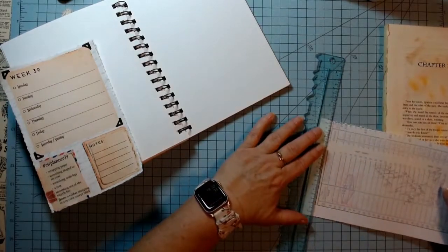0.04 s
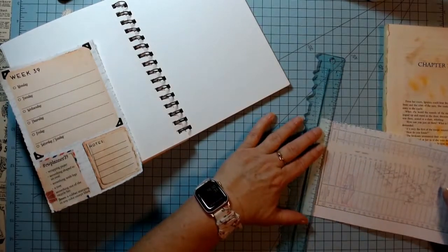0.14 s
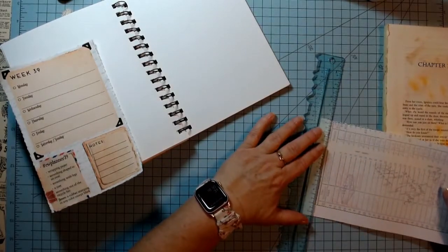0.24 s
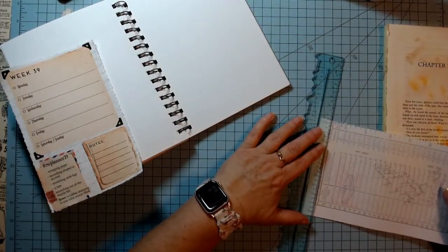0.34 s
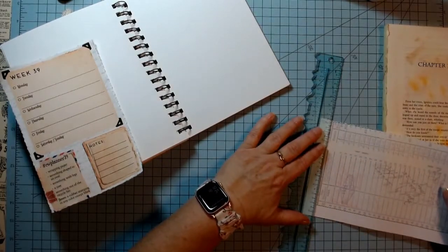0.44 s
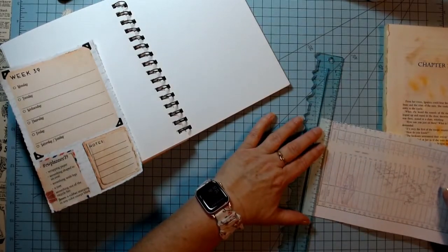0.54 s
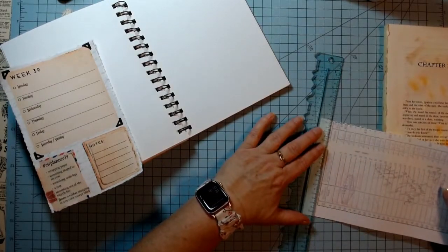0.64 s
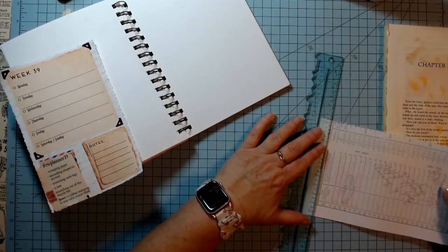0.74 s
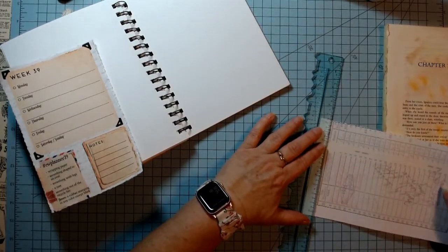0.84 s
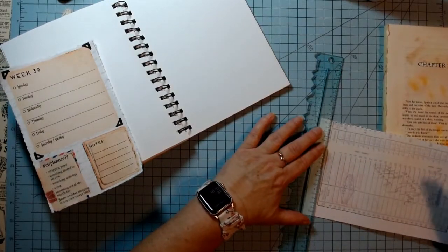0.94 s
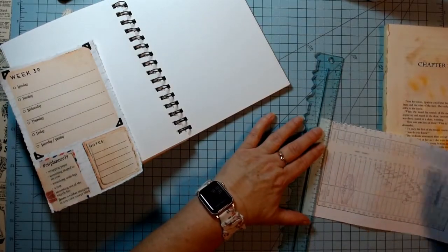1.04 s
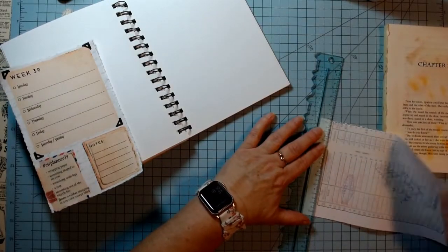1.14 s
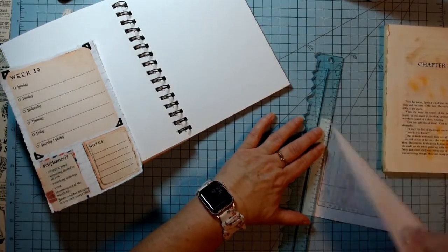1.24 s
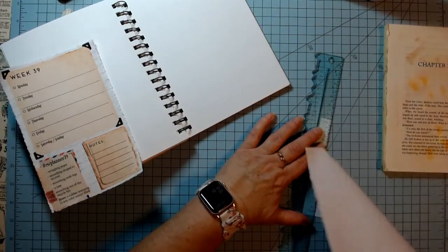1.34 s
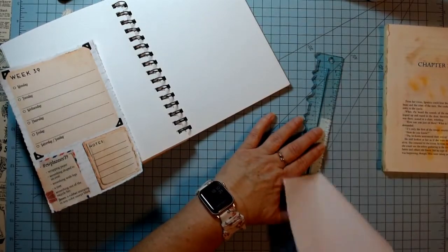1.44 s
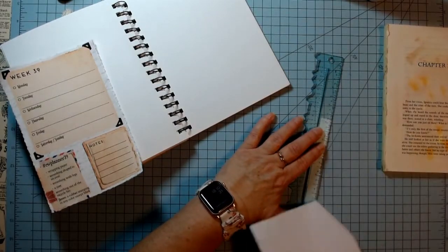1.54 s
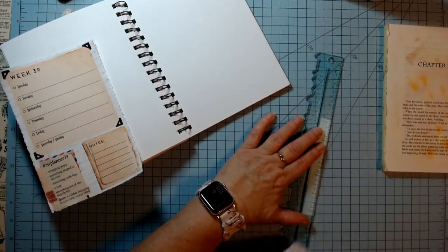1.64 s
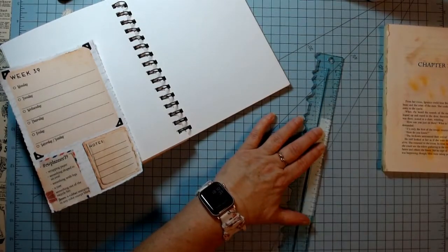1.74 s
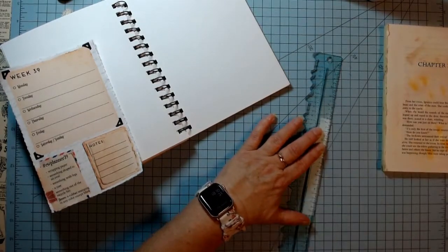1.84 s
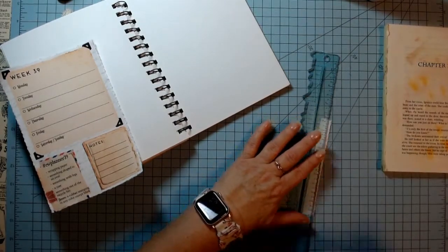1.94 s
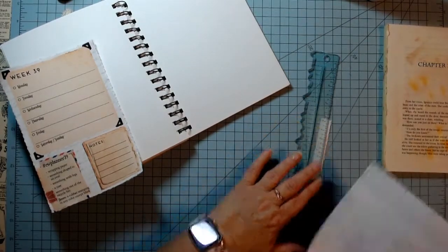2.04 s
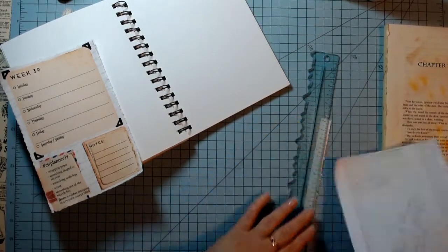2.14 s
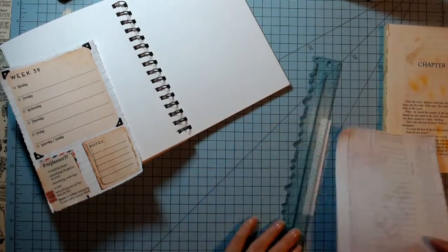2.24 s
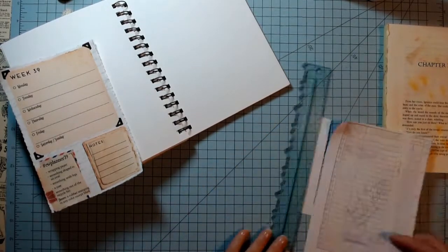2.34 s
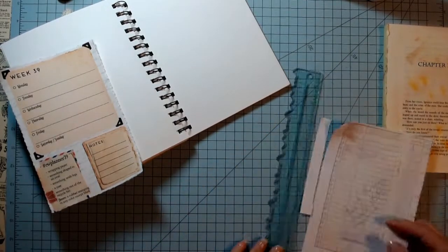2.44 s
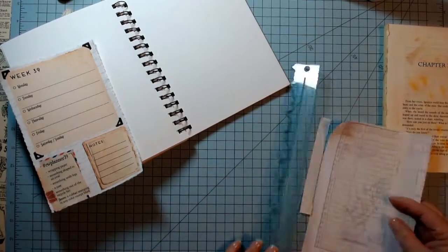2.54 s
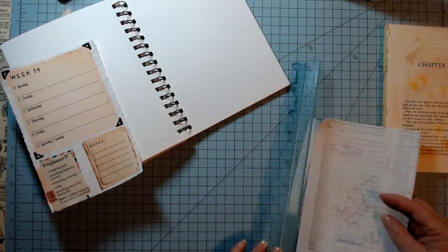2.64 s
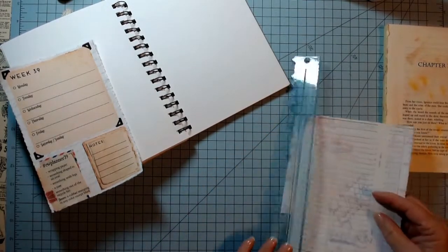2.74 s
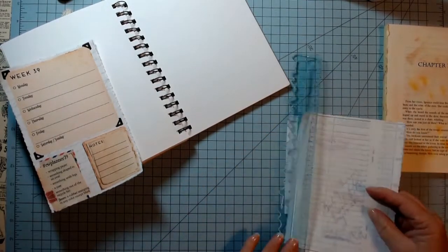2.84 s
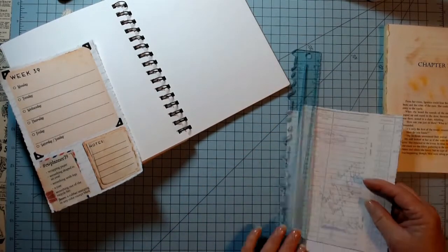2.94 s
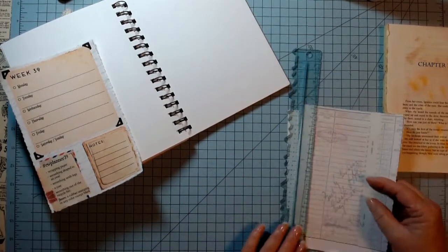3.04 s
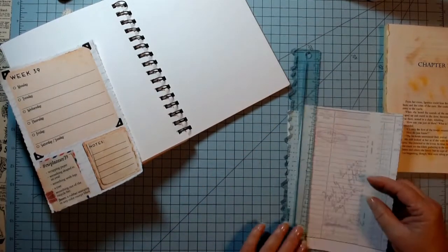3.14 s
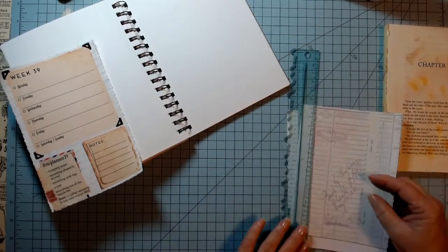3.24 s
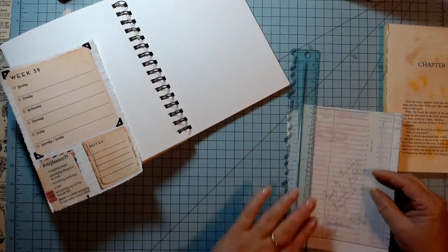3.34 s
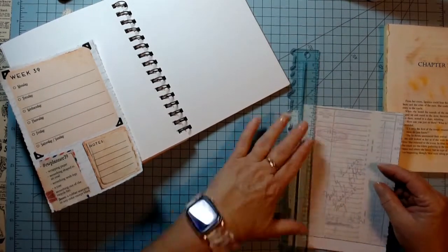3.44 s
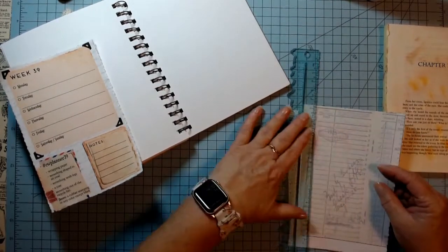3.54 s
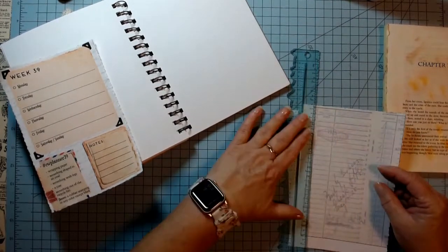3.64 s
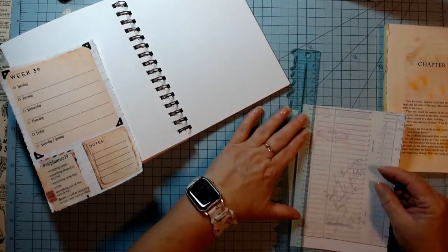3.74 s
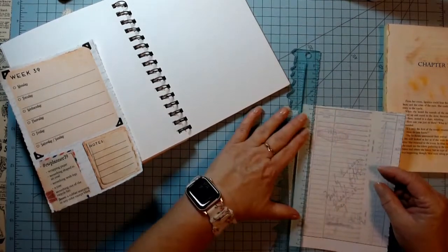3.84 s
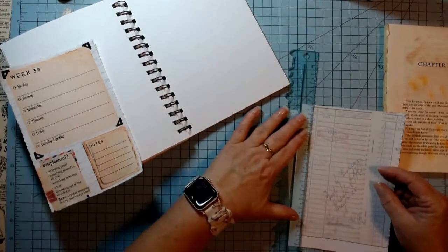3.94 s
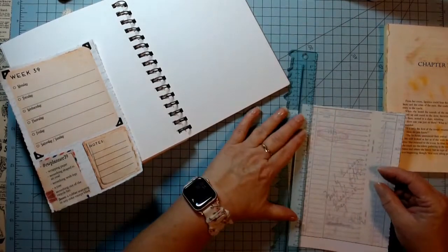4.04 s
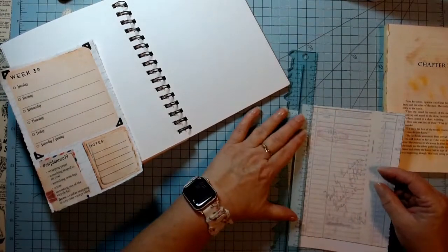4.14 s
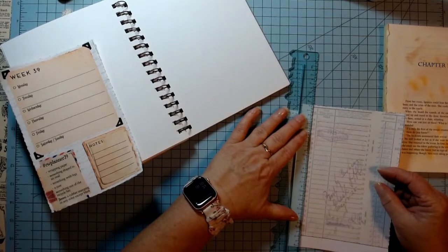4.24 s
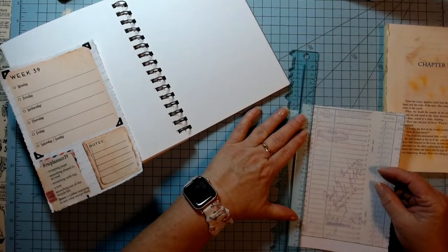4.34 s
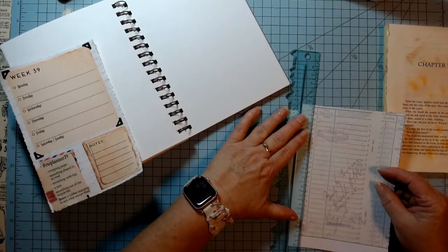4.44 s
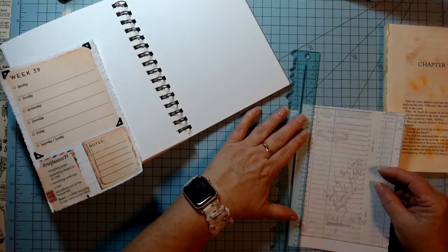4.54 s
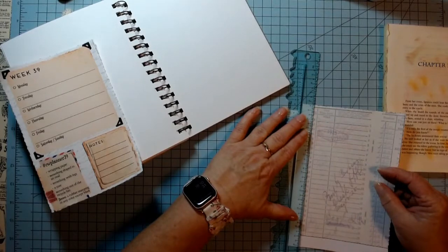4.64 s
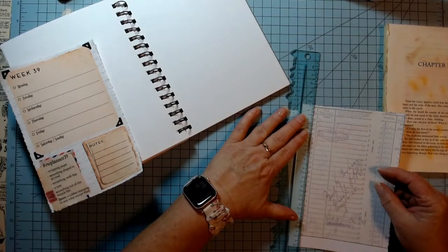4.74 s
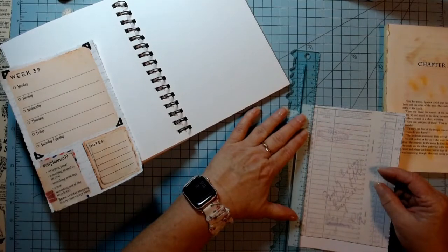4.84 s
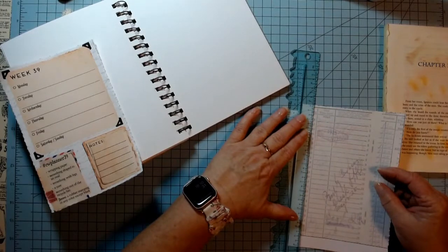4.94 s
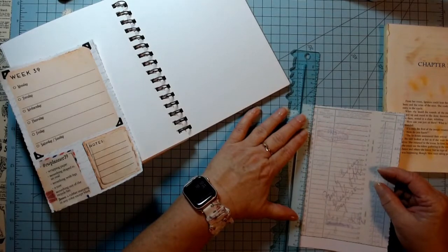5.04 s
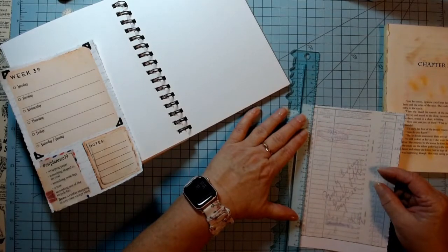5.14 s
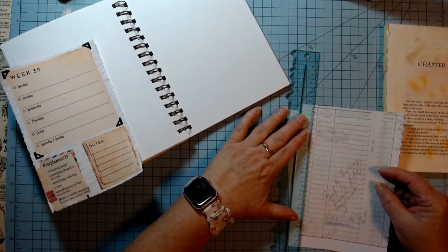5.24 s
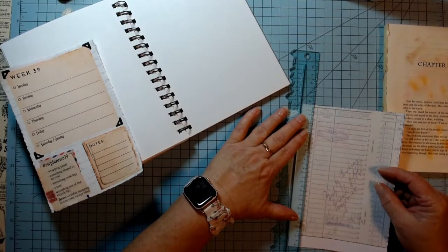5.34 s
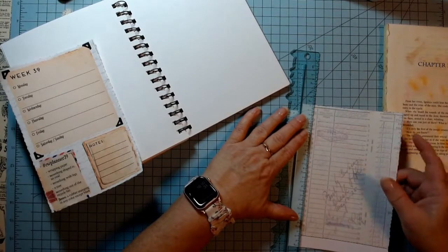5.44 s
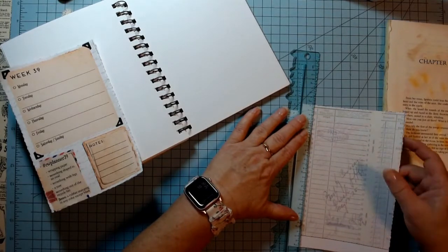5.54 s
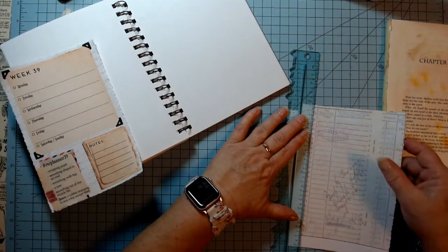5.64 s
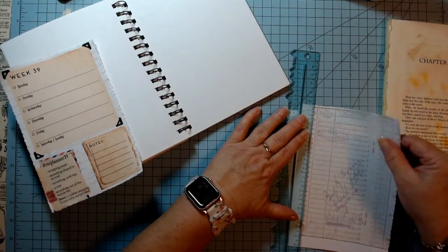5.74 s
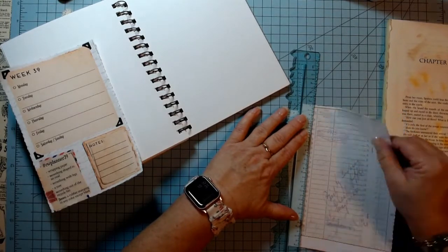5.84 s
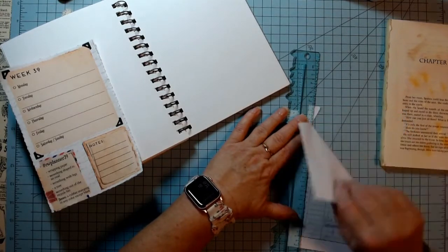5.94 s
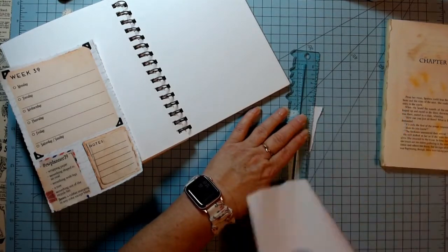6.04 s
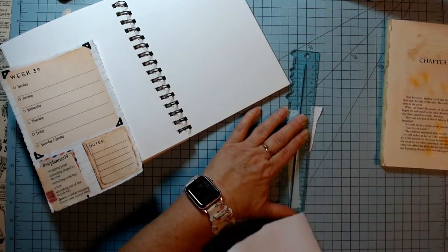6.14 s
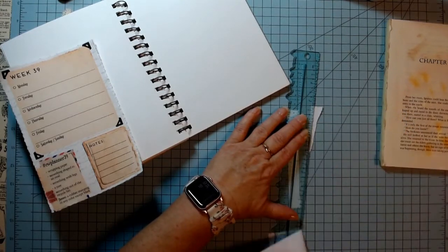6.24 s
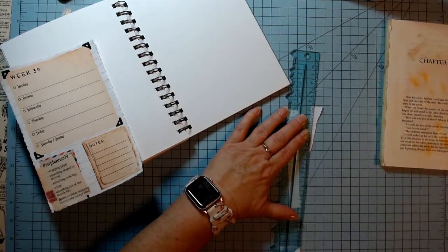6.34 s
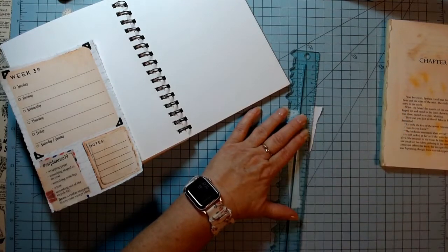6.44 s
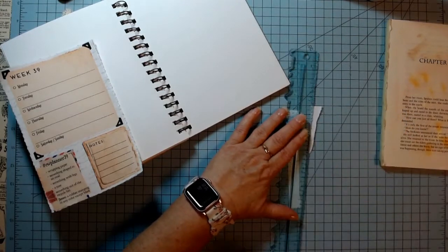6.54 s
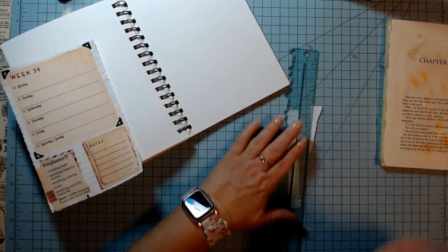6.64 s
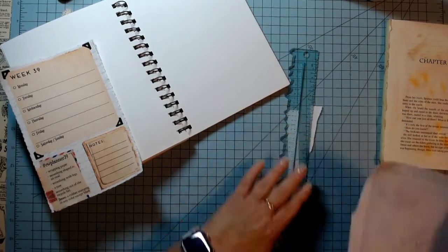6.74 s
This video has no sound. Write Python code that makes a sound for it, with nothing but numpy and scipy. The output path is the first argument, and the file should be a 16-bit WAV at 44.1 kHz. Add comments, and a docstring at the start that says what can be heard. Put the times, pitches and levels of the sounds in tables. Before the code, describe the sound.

A quick, dry rip of paper along a ruler's edge is followed by light crinkles and soft sliding on a cutting mat. The plastic ruler clacks down once and is nudged faintly. Following a lull, another rip starts strongly and trails off, the loose flap fluttering and snapping. The microphone is near the desk in a small room with a low hum and a barely audible, high pulsing whine.

```python
"""In a small room, two strips are ripped off a sheet of paper along a plastic ruler on a cutting mat.
Each rip is a dense run of snapping fibres that shakes the sheet, while the freed flap flutters.
Between the rips the sheet is flicked and slid, with small squeaks, and the ruler lands with a clack.
Underneath lie quiet room noise, a low hum and the faint pulsing whine of a camera."""
import sys
import numpy as np
from scipy import signal
from scipy.fft import rfft, irfft, next_fast_len
from scipy.io import wavfile
from scipy.ndimage import uniform_filter1d

SR = 44100
rng = np.random.default_rng(int(sys.argv[2]) if len(sys.argv) > 2 else 0)


def unload_audio(sound):
    """Save the sound as a 16-bit wav file, at the path given as the first command line argument."""
    columns = np.transpose(np.atleast_2d(sound))
    # keep every value between -1 and 1, then stretch to whole-number steps
    steps = np.round(np.clip(columns, -1, 1) * 32767)
    wavfile.write(sys.argv[1], SR, steps.astype(np.int16))


N = 299483
SIZE = next_fast_len(N + SR // 4, real=True)
TIME, HZ = np.arange(N) / SR, np.fft.rfftfreq(SIZE, 1 / SR)

# three ranges of sound, called body (middle), fizz (high) and bass: (low edge [Hz], high edge [Hz])
# In the tables below, "fizz" and "bass" are levels compared with the body.
BANDS = [(400, 1600), (1600, 14000), (70, 400)]
# how hard the hand pulls, one curve a pull; the second rip takes two: (time [s], level [dB])
PULL_LEVELS = [
    [(1.213, -21), (1.245, -18.5), (1.291, -25), (1.325, -20), (1.387, -26), (1.477, -24.5), (1.501, -28),
     (1.565, -29), (1.585, -35.5)],
    [(5.786, -28.5), (5.79, -26), (5.89, -19), (5.972, -22), (6.026, -26.5), (6.048, -23.5), (6.118, -41),
     (6.162, -32.5)],
    [(6.165, -32.5), (6.193, -31), (6.237, -38.5), (6.399, -34.5), (6.407, -41), (6.445, -43)],
]
# how each pull's tone drifts: (first fizz [dB], last fizz [dB], first bass [dB], last bass [dB])
PULL_DRIFTS = [(5.5, 0, -3, -11), (-4, -1.5, -8, 0.5), (-5, 2.5, -5.5, -11.5)]
# the paper's tone colour, one curve a pull: (frequency [Hz], level [dB])
PAPER_COLOURS = [
    [(50, -40.5), (85, -15.5), (126, 0), (237, -6.5), (314, 0), (382, -4.5), (553, -4.5), (893, 1.5),
     (1870, -3), (2230, -1), (3090, -3.5), (3370, -5), (4200, -10), (4580, -6.5), (15500, -35.5)],
    [(50, -44.5), (85, -16), (134, 3), (232, -6.5), (294, 2.5), (374, -1), (659, -5.5), (893, -2.5),
     (1020, -4), (1440, -4.5), (1760, -11.5), (2230, -6), (3760, -15.5), (5220, -16.5), (15500, -43)],
    [(50, -38), (85, -6.5), (134, -2), (270, -14), (314, -5), (350, -5.5), (644, -7), (751, -7), (819, -3),
     (1680, -13), (2000, -5.5), (5220, -16.5), (15500, -42)],
]
# the freed flap flutters: (start [s], length [s], first pitch [Hz], level [dB])
FLUTTERS = [(1.335, .085, 343.8, -35.5), (1.385, .05, 165, -33), (1.495, 0.044, 150, -38),
            (1.545, .035, 139.1, -37.5), (5.85, 0.063, 168.1, -28.5), (5.935, .05, 326.3, -22),
            (6.16, .055, 140, -37)]
# the sheet buckles: (time [s], level [dB], fizz [dB], bass [dB])
FLICKS = [(1.019, -61.5, 6, -10), (1.127, -25, -10, -9.5), (1.137, -33, 5, -15), (1.212, -17, -5, 3),
          (1.715, -18, -19.5, -26), (1.787, -31, -10.5, -22.5), (1.869, -33, -30, -3),
          (2.011, -48, 9.5, -24), (2.28, -45.5, 2, -28), (5.435, -49, 13.5, 0), (5.635, -61, 6, -8),
          (6.042, -15, -12, -10.5), (6.131, -24.5, -17, -13), (6.163, -16.5, -16, -7),
          (6.451, -28.5, -36, -14), (6.53, -31.5, -2.5, -5), (6.715, -47, -7.5, 5)]
# the ruler lands and rocks: (time [s], level [dB], fizz [dB], bass [dB])
KNOCKS = [(2.905, -68.5, 14, 4), (2.993, -39, -1, -1.5), (2.999, -25, -0.5, -5.5), (3.003, -19, -5, -8),
          (3.046, -26, -3, -5), (3.24, -67.5, 3.5, -7.5), (3.44, -54, -5, 3.5), (3.467, -43.5, -15, -7),
          (6.734, -46, -18, -1.5)]
# the tone colour of the ruler's slap: (frequency [Hz], level [dB])
SLAP_COLOUR = [(35, -32), (60, -0.5), (156, 7.5), (226, -22), (266, 7.5), (443, -15), (546, -22),
               (705, -15), (1150, -21.5), (1380, -13.5), (1550, -24.5), (1960, -10.5), (6870, -27.5),
               (15500, -47)]
# the ruler's own notes: (pitch [Hz], level [dB], time to fade 60 dB without the hand on it [s])
RULER_NOTES = [(208, 5.5, 0.36), (705, -34, 0.39), (1780, -29, 0.23), (1930, -13, 0.48), (3000, -11, 0.17),
               (3050, -20, 0.18), (3980, -24, 0.22), (4450, -29, 0.82)]
# frequencies that the plastic strengthens: (centre [Hz], width [Hz], level [dB])
PLASTIC_PEAKS = [(2737, 160, 2), (4960, 289, -8)]
# paper and hand slide on the mat: (start [s], length [s], level [dB], fizz [dB], bass [dB])
PAPER_SLIDES = [(.735, .04, -83, 8.5, -3), (.84, .28, -83, 2, 2), (1.116, 0.071, -46.5, -16.5, 7),
                (1.58, 0.035, -42.5, -13.5, -13), (1.66, .05, -55, -18, -11),
                (1.703, 0.11, -43.5, -11, -18), (1.83, 0.19, -57, 0.5, -13), (2.04, 0.14, -70, 6, -12),
                (2.12, 0.12, -57, -3, -7), (2.265, 0.067, -54.5, -6, -4), (2.36, 0.19, -74, -4.5, 3),
                (2.54, 0.071, -70, 8, -15), (5.32, 0.11, -73.5, 2, 2), (5.42, 0.037, -61.5, 0.5, 6.5),
                (5.69, 0.07, -74.5, -8.5, 5.5), (5.772, 0.018, -48.5, -6, 6.5),
                (6.44, 0.015, -43.5, -13.5, -9.5), (6.53, 0.023, -54, -5, 5.5)]
# the ruler is nudged over the mat: (start [s], length [s], level [dB], fizz [dB], bass [dB])
RULER_SLIDES = [(2.785, 0.052, -70.5, 4.5, -3), (2.895, 0.034, -79.5, 14, -1),
                (3.09, 0.06, -71.5, -8.5, 7.5), (3.235, 0.074, -82.5, 2, 3), (3.44, 0.045, -66.5, -3, 9),
                (5.23, 0.083, -79.5, 4, 5), (5.52, 0.15, -80.5, 5, 4), (6.6, .11, -78, 4.5, 6),
                (6.71, .075, -68, 3.5, 0)]
# the tone colour of sliding on the mat: (frequency [Hz], level [dB])
SLIDE_COLOUR = [(88, -38.5), (150, -8), (221, -0.5), (258, -5), (388, -4), (509, -3), (1060, 0.5),
                (1150, -2.5), (1910, -5.5), (2270, -4), (5330, -12.5), (8170, -25.5), (15500, -32)]
# squeaks on the mat: (start [s], length [s], first pitch [Hz], level [dB], glide [octaves/s])
SQUEAKS = [(.6, 0.064, 451, -75, 2.5), (1.708, 0.018, 660, -43, 6), (2.272, 0.026, 1905, -47, -5.5),
           (2.555, 0.069, 1785, -61, 5.5), (2.66, 0.087, 754, -71.5, -1.3), (2.9, 0.027, 2730, -72.5, 0.5),
           (3.25, 0.094, 2770, -87, -0.5), (3.52, 0.1, 434, -60, 1), (5.135, 0.056, 400, -71, 0.5),
           (6.712, 0.054, 2850, -54, 1), (6.735, 0.087, 3590, -60, 2.5)]
# how long the room echoes: (frequency [Hz], time to fade 60 dB [s])
ECHO_FADE = [(150, 0.14), (400, 0.058), (1040, 0.15), (2760, 0.18), (7280, 0.21), (15000, 0.026)]
# how alike the echoes are left and right: (frequency [Hz], likeness [1 = the same])
ECHO_LIKENESS = [(100, .95), (300, .9), (640, .68), (1400, .35), (3000, .08), (8000, -.1)]
# how the sound leans to one side: (frequency [Hz], left minus right [dB])
SIDE_LEAN = [(60, 5), (110, 0), (200, 4.5), (380, 1), (700, 2), (1290, 2), (2380, 0.5), (4400, -0.5),
             (8120, 0.5), (15000, -1)]
# the tone colour of the room noise: (frequency [Hz], level [dB])
AIR_COLOUR = [(12, -31), (20, 3), (53, -2.5), (70, -16.5), (92, -16.5), (148, -19), (342, -22.5),
              (416, -31.5), (614, -33), (2610, -45), (4070, -48), (4680, -50), (7730, -47.5), (8880, -63.5),
              (15500, -62.5)]
# how alike the room noise is left and right: (frequency [Hz], likeness [1 = the same])
AIR_LIKENESS = [(60, 0.72), (130, 1), (290, 0.51), (640, 0.63), (1410, 0.079), (3100, 0.04), (6820, 0.33),
                (15000, 0.2)]
# how loud the whine's pulses are: (time [s], level [dB])
WHINE_LEVELS = [(0, -88), (5.1, -86), (5.6, -79.5), (6.7, -75.5)]
# the tones in the whine: (pitch [Hz], relative level [dB])
WHINE_TONES = [(7000, -11.5), (7650, -8.5), (8000, -2.5), (12000, -12.5)]


def tearing():
    """Fibres snap by the thousand along the ruler's edge; the tear catches and runs in small surges."""
    surge = gain_of(1.1 * wander(100))
    fibres = [evened(surge * snaps(per_s=3000, spread_db=2, clump_db=1.5, clump_hz=180)) for _ in BANDS]
    return sum(friction(pull_force(curve, drift), colour, fibres, trims_db=(.3, .3, -1.5))
               for curve, drift, colour in zip(PULL_LEVELS, PULL_DRIFTS, PAPER_COLOURS))


def pull_force(curve, drift, edge_s=.006):
    """One pull shares its force between body, fizz and bass; the shares drift as the tear runs."""
    times, levels = np.transpose(curve)
    level_db = np.interp(TIME, times, levels)
    start, end = times[0], times[-1]
    fizz_db = np.interp(TIME, [start, end], drift[:2])
    bass_db = np.interp(TIME, [start, end], drift[2:])
    fizz_db += 0.23 * (level_db - level_db.max())  # a slacker pull snaps fewer fibres and sounds duller
    pulling = np.clip(np.minimum(TIME - start, end - TIME) / edge_s + .5, 0, 1)
    body = pulling * gain_of(level_db) / np.hypot(1, gain_of(fizz_db))
    return body * gain_of([np.zeros(N), fizz_db, bass_db])


def flap_flutter(fall_octaves_per_s=6.5):
    """The freed flap flutters, each time dropping in pitch as it grows longer."""
    rows = [(*row, -fall_octaves_per_s) for row in FLUTTERS]
    return glides(rows, jitter=0.047, jitter_hz=80, rough_db=1)


def sheet_flicks():
    """The sheet buckles with a small crack and a short crinkle."""
    return blows(FLICKS, PAPER_COLOURS[0], trims_db=(-6, -6.5, -8), crack=0.64, rise_s=.0015, fade_s=.008)


def ruler_knocks(damping_s=0.048):
    """The ruler slaps the mat and rings with its own notes, which the hand quickly damps."""
    slap = blows(KNOCKS, SLAP_COLOUR, trims_db=(-4.5, -5, -4), crack=4.2, rise_s=0.00028, fade_s=0.0054)
    t, ringing = TIME[:SR // 2], np.zeros(N)
    ring = sum(gain_of(db - 60 * t / fade_s) * np.sin(2 * np.pi * hz * t)
               for hz, db, fade_s in RULER_NOTES)
    ring *= np.exp(-t / damping_s)
    for start, db, *_ in KNOCKS:
        part = ringing[round(start * SR):][:len(t)]
        part += gain_of(db - 19.5) * ring[:len(part)]
    return slap + ringing


def through_ruler(x, contact_db):
    """The plastic strengthens some frequencies of whatever rubs or knocks on it."""
    peaks = sum(gain_of(db + contact_db) / (1 + 2j * (HZ - hz) / width)
                for hz, width, db in PLASTIC_PEAKS)
    return shaped(x, 1 + peaks)


def sliding(rows, rise_s=0.029, sag_db_per_s=14, stop_s=.022):
    """A slide is a fine run of tiny catches: it gathers speed, eases off and coasts to rest."""
    catches = [snaps(per_s=7000, spread_db=3, clump_db=1.5, clump_hz=60) for _ in BANDS]
    force = np.zeros((3, N))
    for start, length, db, fizz_db, bass_db in rows:
        part = force[:, round(start * SR):][:, :SR // 2]
        t = TIME[:part.shape[1]]
        speed = np.minimum(t / rise_s, 1) * np.exp(-np.maximum(t - length, 0) / stop_s)
        part += speed * gain_of(db - sag_db_per_s * t) * gain_of([[0], [fizz_db], [bass_db]])
    return friction(force, SLIDE_COLOUR, catches, trims_db=(.3, .3, -1))


def mat_squeaks():
    """Paper, fingers and ruler stick and slip on the mat, making short, rough tones."""
    return glides(SQUEAKS, jitter=.117, jitter_hz=670, rough_db=1.5)


def room(x):
    """The sound shifts at random between two patches of the sheet, each with its own echoes."""
    share = uniform_filter1d(1. * (wander(45) > 0), size=100)
    first, second = (echo_path(left_delay_s=samples / SR) for samples in (3, 4.7))
    heard = shaped(x * share, first) + shaped(x * (1 - share), second)
    return shaped(heard, gain_of(read(SIDE_LEAN) * np.array([[.5], [-.5]])))


def echo_path(left_delay_s, early_db=1.5, tail_db=-2, early_s=0.013):
    """The direct sound reaches the right side first; desk and walls answer with dense echoes."""
    n, echoes_per_s = SR // 2, 5000
    bounces = rng.standard_normal((2, 2, n)) * (rng.random((2, 2, n)) < echoes_per_s / SR)
    near, far = bounces * (TIME[:n] > .0006)
    early = near * np.exp(-TIME[:n] / early_s)
    hz, t, spectrum = signal.stft(far, SR, nperseg=256)
    fade = gain_of(-60 * t / read(ECHO_FADE, hz)[:, None])
    tail = signal.istft(spectrum * fade, SR, nperseg=256)[1][:, :n]
    echoes = (gain_of(early_db) * evened(early) + gain_of(tail_db) * evened(tail)) / np.sqrt(n)
    response = rfft(paired(np.pad(echoes, ((0, 0), (0, N - n))), ECHO_LIKENESS), SIZE)
    response += np.exp(-2j * np.pi * HZ * np.array([[left_delay_s], [0]]))  # the direct sound
    # keep the echoes' fine ripples, but even out the broad tone colour
    summed_power = np.cumsum(abs(response.mean(0)) ** 2)
    lo, hi = (np.searchsorted(HZ[:-1], edge) for edge in (HZ * .9 - 25, HZ * 1.1 + 25))
    return response * causal(np.sqrt((hi - lo) / (summed_power[hi] - summed_power[lo])))


def room_air(rumble_cut_hz=45):
    """Quiet, deep room noise whose level wavers a little."""
    colour = gain_of(read(AIR_COLOUR))
    colour /= np.sqrt(np.mean(colour ** 2 * (HZ > BANDS[2][0])))
    rumble_cut = HZ ** 2 / (HZ ** 2 + rumble_cut_hz ** 2)
    level = gain_of(-71.12 + 0.3 * wander(4))
    noise = paired(rng.standard_normal((2, N)), AIR_LIKENESS)
    return level * shaped(noise, colour * rumble_cut)


def low_hum(hum_hz=41):
    """One low tone wavers in level and pitch, slightly louder on the left."""
    level = gain_of(-58.5 + 1.2 * wander(4.8))
    pitch = hum_hz + 0.53 * wander(15)
    return level * np.sin(2 * np.pi * np.cumsum(pitch) / SR) * gain_of([[.4], [-.4]])


def camera_whine(pulses_per_s=30, on_share=.2):
    """A camera gives off a thin, high whistle in quick, even pulses."""
    is_on = (TIME * pulses_per_s + .02) % 1 < on_share
    level = gain_of(np.interp(TIME, *np.transpose(WHINE_LEVELS)))
    tone = sum(gain_of(db) * np.sin(2 * np.pi * hz * TIME + 0.69 * wander(200)) for hz, db in WHINE_TONES)
    return uniform_filter1d(is_on * level, size=50) * evened(tone)


def snaps(per_s, spread_db, clump_db, clump_hz):
    """Tiny snaps at random moments, uneven in size, with louder and softer clumps."""
    size = gain_of(spread_db * np.minimum(rng.exponential(1, N), 4) + clump_db * wander(clump_hz))
    return evened(size * rng.choice([-1, 1], N) * (rng.random(N) < per_s / SR))


def friction(forces, colour, snap_runs, trims_db):
    """Runs of snaps shake the body, fizz and bass, each as hard as its force pushes."""
    return sum(shaped(gain_of(db) * force * run, band)
               for force, band, run, db in zip(forces, band_filters(colour), snap_runs, trims_db))


def blows(rows, colour, trims_db, crack, rise_s, fade_s):
    """Each blow is one sharp crack and a burst of noise that quickly dies."""
    out = np.zeros(N)
    for k, band in enumerate(band_filters(colour)):
        force = np.zeros(N)
        for start, db, fizz_db, bass_db in rows:
            part = force[round(start * SR):][:SR // 8]
            t = TIME[:len(part)]
            loudness = np.minimum(t / rise_s, 1) * np.exp(-np.maximum(t - rise_s, 0) / fade_s)
            burst = rng.standard_normal(len(t)) * loudness
            burst[0] += crack
            part += burst * gain_of(db + (0, fizz_db, bass_db)[k] + trims_db[k])
        out += shaped(force, band)
    return out


def glides(rows, jitter, jitter_hz, rough_db):
    """Short, unsteady tones that fade in, slide in pitch and fade out."""
    out = np.zeros(N)
    wobble = 1 + jitter * wander(jitter_hz)
    roughness = gain_of(rough_db * wander(jitter_hz))
    for start, length, first_hz, db, octaves_per_s in rows:
        first, n = round(start * SR), int(length * SR)
        span = np.arange(first, min(first + n, N))
        pitch = first_hz * 2 ** (octaves_per_s * TIME[:len(span)]) * wobble[span]
        tone = evened(roughness[span] * np.sin(2 * np.pi * np.cumsum(pitch) / SR))
        out[span] += gain_of(db) * tone * signal.windows.tukey(n, .3)[:len(span)]
    return out


def band_filters(colour):
    """Splits a tone colour into body, fizz and bass filters of equal power within their ranges."""
    gain = gain_of(read(colour))
    below_body, below_fizz = (1 / (1 + (HZ / edge) ** 10) for edge in BANDS[0])
    shares = (below_fizz * (1 - below_body), 1 - below_fizz, below_body)
    parts = [gain * np.sqrt(share) for share in shares]
    return [causal(part / np.sqrt(np.mean(part ** 2 * (HZ > lo) * (HZ < hi))))
            for part, (lo, hi) in zip(parts, BANDS)]


def causal(gain):
    """Makes a filter answer like a struck object: nothing sounds before the blow."""
    log_gain = np.log(np.maximum(gain, gain.max() * 1e-5))
    cepstrum = irfft(log_gain, SIZE)[:SIZE // 2]  # the curve laid out in time, forward half only
    return np.exp(rfft(2 * cepstrum, SIZE) - cepstrum[0])


def paired(two, likeness_table):
    """Blends two unrelated signals into a left and right that are partly alike."""
    likeness = np.clip(read(likeness_table), -1, 1)
    right = shaped(two[0], likeness) + shaped(two[1], np.sqrt(1 - likeness ** 2))
    return np.array([two[0], right])


def wander(rate_hz):
    """A smooth random wobble of typical size 1; a higher rate wobbles faster."""
    return evened(shaped(rng.standard_normal(N), np.exp(-(HZ / rate_hz) ** 2)))


def shaped(x, gain):
    """Turns each frequency of a signal up or down by its own gain."""
    return irfft(rfft(x, SIZE) * gain, SIZE)[..., :N]


def read(points, hz=HZ):
    """Joins a table's points into a curve, with frequency spaced by octaves."""
    frequency, value = np.transpose(points)
    return np.interp(np.log(hz + 1), np.log(frequency + 1), value)


def evened(x):
    """Scales a signal to an average power of 1."""
    return x / np.sqrt(np.mean(x ** 2) + 1e-20)


def gain_of(db):
    """Turns decibels into a number to multiply by."""
    return 10 ** (np.asarray(db) / 20)


def scene():
    """Paper and ruler sound from one place on the desk, over the room's steady background."""
    flicks, flutter, squeaks = sheet_flicks(), flap_flutter(), mat_squeaks()
    paper = tearing() + flutter + flicks + squeaks + sliding(PAPER_SLIDES)
    ruler = through_ruler(sliding(RULER_SLIDES), contact_db=1)
    ruler += through_ruler(ruler_knocks(), contact_db=0)
    return room(paper + ruler) + room_air() + low_hum() + camera_whine()


def record(dry, top_hz=15800):
    """Cuts away the very highest treble."""
    low_pass = signal.firwin(511, top_hz, window=("kaiser", 9), fs=SR)
    return signal.oaconvolve(dry, low_pass[None], "same")


dry = scene()
out = record(dry)
unload_audio(out)
```